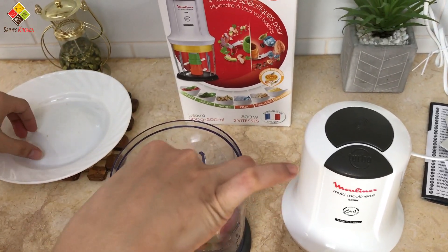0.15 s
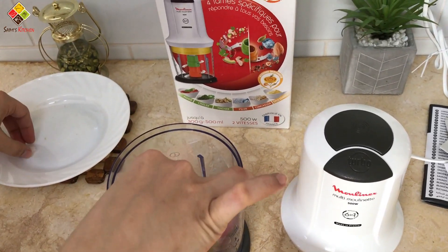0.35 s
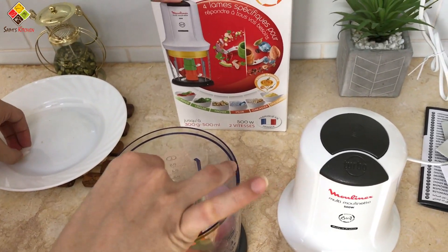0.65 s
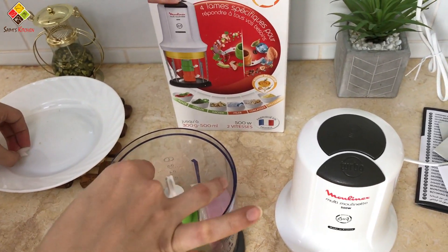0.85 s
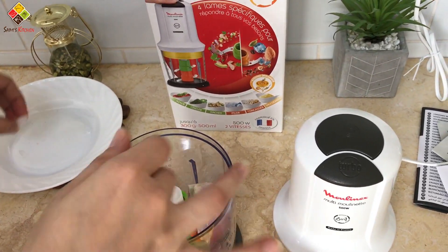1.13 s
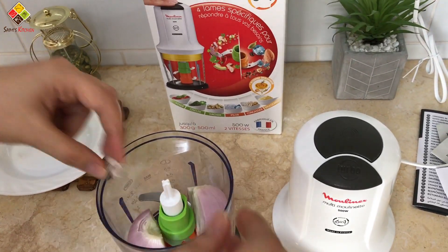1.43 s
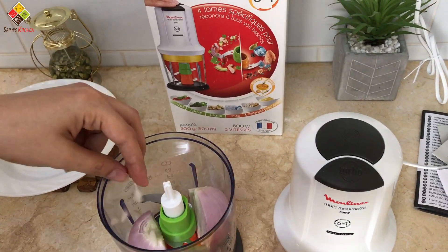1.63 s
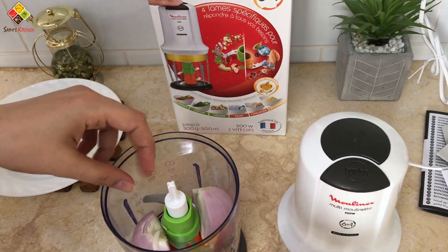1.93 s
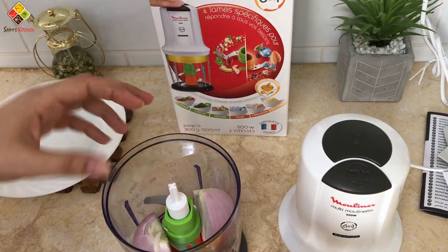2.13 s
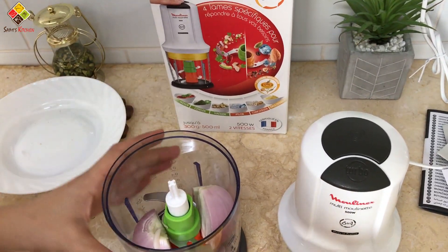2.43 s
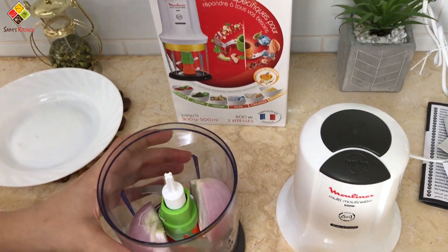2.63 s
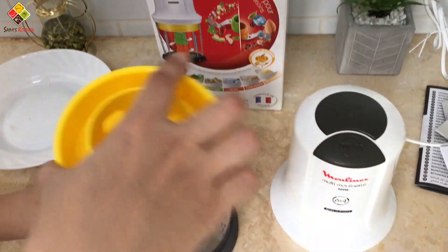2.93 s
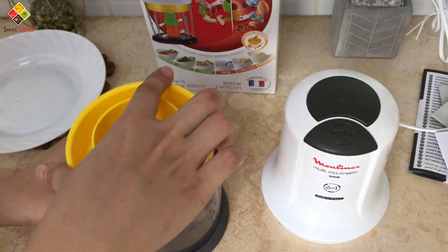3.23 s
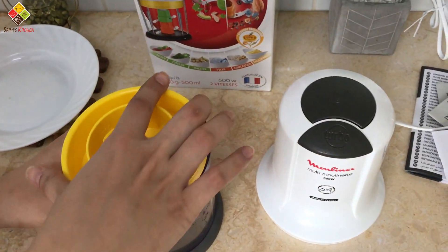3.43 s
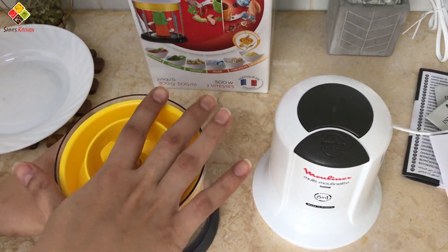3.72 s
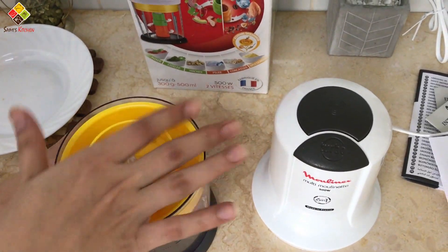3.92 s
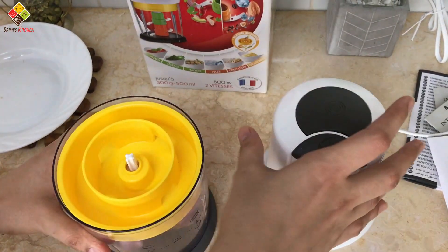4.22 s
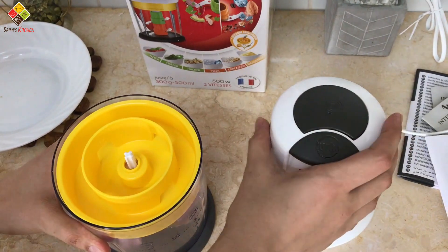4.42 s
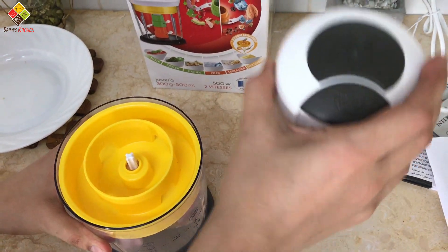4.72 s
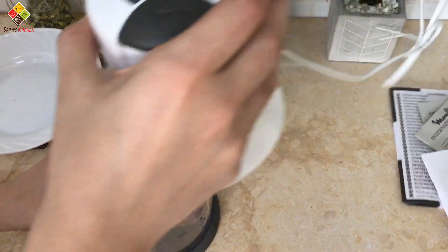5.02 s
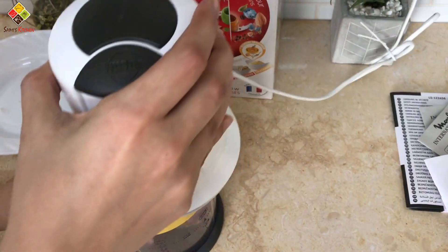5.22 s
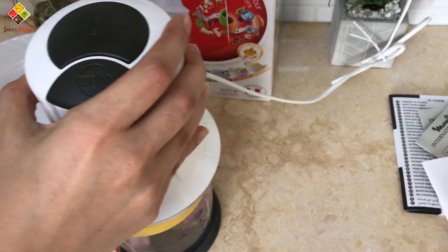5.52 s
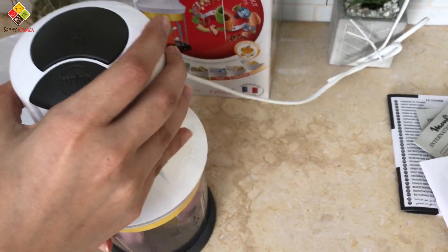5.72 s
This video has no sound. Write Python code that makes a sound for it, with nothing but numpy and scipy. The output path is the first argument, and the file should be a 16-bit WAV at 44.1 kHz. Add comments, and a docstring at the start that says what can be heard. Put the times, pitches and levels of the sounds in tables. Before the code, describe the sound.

A low, throbbing appliance hum runs throughout in a small, slightly echoing kitchen, with soft hiss and a very faint thin whine. At about 0.2 seconds a china plate clinks lightly, and onion drops into a plastic chopper jar, rattling the blade. More dull knocks of onion land around 0.8 seconds, with a softer one at 1.6. A dry click and small rattles come near 2 seconds. At 2.6 the jar is seated with a sharp, bright knock, the loudest sound. From 3.3 to 3.7 the plastic lid is pressed home in a quick run of clacks, with faint rubbing. From about 4 seconds a hand rustles quietly on the motor housing, with a light tap at 4.4 and a brief slide at 5. The housing clunks onto the jar at 5.4, taps a few times and seats with a firm clunk and click near 5.8. Everything is heard close up.

```python
"""In a small tiled kitchen, close to a stone counter, onion is picked off a china plate and dropped
into the plastic jar of a mini chopper, rattling the blade. The jar is knocked into place, the lid is
pressed home and the motor housing is seated on top, switched off. Each impact excites damped normal
modes; hands on plastic make stick-slip noise; the room reverberates. A low appliance hum beats
throughout, with soft air noise and a faint electric whine."""
import sys
import numpy as np
from scipy import signal
from scipy.fft import rfft, irfft
from scipy.io import wavfile
from scipy.ndimage import uniform_filter1d

SR = 44100
rng = np.random.default_rng(int(sys.argv[2]) if len(sys.argv) > 2 else 0)


def wav_record(signal):
    """Record a signal, one row per channel, as 16-bit PCM in the file named by sys.argv[1]."""
    frames = np.transpose(np.atleast_2d(signal))
    bounded = np.clip(frames, -1, 1)
    # unit amplitude maps onto the largest positive 16-bit level
    quanta = np.round(bounded * 32767).astype(np.int16)
    wavfile.write(sys.argv[1], SR, quanta)


N = 258426
TIME_S = np.arange(N) / SR
RING_S = np.arange(SR // 4) / SR  # time since a blow


def undb(db):
    """Decibels to amplitude ratio."""
    return 10 ** (np.asarray(db) / 20)

def unit(x):
    """Normalisation to unit energy."""
    return x / np.sqrt(np.sum(x ** 2))

def level(x, db):
    """Normalisation to an rms level."""
    return unit(x) * np.sqrt(len(x)) * undb(db)

def fade(t, t60_s):
    """Exponential decay, 60 dB down after t60_s."""
    return undb(-60 * t / t60_s)

def add(out, start_s, x):
    """Superposition of x on out from start_s."""
    i = max(int(start_s * SR), 0)
    out[i:i + len(x)] += x[:len(out) - i]

def colour(x, spectrum):
    """Spectral shaping by (frequency_hz, gain_db) points, with a steep roll-off below the lowest."""
    hz, db = np.transpose(spectrum)
    f = np.fft.rfftfreq(len(x), 1 / SR) + 1
    gain = undb(np.interp(np.log(f), np.log(hz), db)) * np.minimum(f / hz[0], 1) ** 2
    return irfft(rfft(x) * gain, len(x))

def noise(spectrum, size):
    """Filtered white noise of unit rms."""
    return level(colour(rng.standard_normal(size), spectrum), 0)

def band(hz, width_hz):
    """Narrow-band noise of unit rms: the wider the Gaussian band, the faster it wavers."""
    f = np.fft.rfftfreq(N, 1 / SR)
    bell = np.exp(-2 * ((f - hz) / width_hz) ** 2)
    return level(irfft(rfft(rng.standard_normal(N)) * bell, N), 0)

def walk(rate_hz, size):
    """Smooth random modulation of unit rms."""
    hold = max(int(SR / rate_hz), 1)
    steps = np.repeat(rng.standard_normal(size // hold + 2), hold)
    return level(uniform_filter1d(steps, hold)[:size], 0)

def ring(modes, detune):
    """Damped normal modes: grip and point of contact set each one's share, pitch and sign."""
    hz, db, t60_s = np.transpose(modes)[:, :, None]
    share_db, shift, side = rng.standard_normal((len(modes), 3)).T[:, :, None]
    sines = np.sin(2 * np.pi * hz * (1 + detune * shift) * RING_S)
    decays = fade(RING_S, t60_s) / np.sqrt(t60_s)  # equal energy for any decay time
    return unit(np.sum(np.sign(side) * undb(db + share_db) * sines * decays, axis=0))

def crack(spectrum, decay_s, db=0):
    """Modal overlap: modes too dense to resolve merge into a brief, pitchless burst."""
    burst = rfft(rng.standard_normal(len(RING_S)) * fade(RING_S, decay_s))
    whitened = irfft(burst / np.abs(burst), len(RING_S))
    return undb(db) * unit(colour(whitened, spectrum) * fade(RING_S, 2 * decay_s))

def struck(blows, body, rise_s):
    """Impact excitation: each blow drives the body afresh; a soft contact low-passes its response."""
    out = np.zeros(N)
    onset = 1 - np.exp(-RING_S / rise_s)
    for start_s, level_db, cutoff_hz in blows:
        contact = signal.butter(2, cutoff_hz, fs=SR, output="sos")
        hit = signal.sosfilt(contact, body() * onset)
        add(out, start_s, hit * undb(level_db) / np.std(hit[:SR // 100]))  # level of the first 10 ms
    return out

def settling(blows, rebound):
    """Rebound: a second, weaker contact follows each blow as the object settles."""
    delay_s, change_db, cutoff_hz = rebound
    return list(blows) + [(s + delay_s, db + change_db, cutoff_hz) for s, db, _ in blows]


# Wavering parts of the hum: pitch_hz, width_hz, level_db
HUM_BANDS = [(43.9, 1.4, -52.5), (57.74, 3.2, -46), (71.4, 2.9, -49), (111.9, 10, -55.5)]
def appliance_hum(pitch_hz=69.7, level_db=-35):
    """Beating: a steady tone throbs against weaker noise bands close to it in frequency."""
    tone = level(np.sin(2 * np.pi * pitch_hz * TIME_S), level_db)
    return tone + sum(undb(db) * band(hz, width_hz) for hz, width_hz, db in HUM_BANDS)

# Spectra of the low air noise and its hiss: frequency_hz, relative_density_db
AIR_SPECTRUM = [(53, -27), (90, -3.5), (94, -14), (168, -10.5), (199, -19), (226, -15.5), (342, -17.5),
                (450, -23), (493, -22), (746, -19.5), (1060, -18), (1210, -21.5), (2000, -31.5),
                (2600, -52), (4400, -120)]
HISS_SPECTRUM = [(2300, 8), (3000, 3.5), (3800, -2.5), (4250, 0), (4900, -11), (5700, -1.5), (6600, -3),
                 (8300, -8.5), (10500, -15.5), (12000, -8.5), (16000, -13.5)]
def air():
    """Stationary broadband noise: soft room air under a faint hiss."""
    return level(noise(AIR_SPECTRUM, N), db=-46) + level(noise(HISS_SPECTRUM, N), db=-62.5)

# Electric tones before modulation: pitch_hz, level_db
WHINE_TONES = [(2417, -82), (2536, -76), (2993, -79), (5593, -82.5), (6245, -79), (6659, -84.5),
               (7779, -85)]
# Their slight drop midway: time_s, gain_db
WHINE_GAIN = [(2.9, 1), (3.5, -1)]
def whine(waver_db=4.0, waver_hz=8.31):
    """Amplitude modulation: faint, thin electric tones waver independently."""
    tones = sum(level(np.sin(2 * np.pi * hz * TIME_S), db) * undb(waver_db * walk(waver_hz, N))
                for hz, db in WHINE_TONES)
    return tones * undb(np.interp(TIME_S, *np.transpose(WHINE_GAIN)))

# Touches on the plate: start_s, level_db, cutoff_hz
PLATE_IMPACTS = [(.186, -47.5, 6000), (.236, -55, 14000)]
# Second contact: delay_s, change_db, cutoff_hz
PLATE_REBOUND = (0.0078, -1, 10000)
# Modes of the china: pitch_hz, energy_db, t60_s
PLATE_MODES = [(4430, 1.5, 0.088), (6305, -8.5, .08), (7446, -3, 0.057), (9000, -3, 0.051),
               (11480, 2.5, 0.06), (14000, -12, 0.026)]
# Dense modes of any thin edge: frequency_hz, relative_density_db
EDGE_SPECTRUM = [(200, -31), (2000, -33), (3400, -4), (4200, -2), (5300, 2.5), (7400, -3), (8500, -1.5),
                 (10500, -9.5), (12000, 0.5), (16000, 0)]
def plate():
    """Free vibration of a stiff plate: china clinks in high modes as onion is picked off it."""
    def body():
        return ring(PLATE_MODES, detune=0.001) + crack(EDGE_SPECTRUM, decay_s=0.033, db=-5)
    return struck(settling(PLATE_IMPACTS, PLATE_REBOUND), body, rise_s=0.00052)

# Snaps of onion skin and plastic catches: start_s, level_db, cutoff_hz
SKIN_AND_CATCH_SNAPS = [(.236, -49.5, 16000), (.674, -58, 14000), (1.107, -55, 9000), (1.1318, -43, 11900),
                        (2.0315, -41, 14000), (2.052, -31, 11200), (2.2222, -47, 6900),
                        (3.486, -51.5, 9000), (3.574, -45.5, 14000), (4.923, -54.5, 3000),
                        (5.7245, -48, 11900), (5.7763, -30.5, 9000)]
def snaps(impacts):
    """Impulse response of a thin edge: a dry, bright click."""
    return struck(impacts, lambda: crack(EDGE_SPECTRUM, decay_s=0.032), rise_s=0.00015)

# Onion landing: start_s, level_db, cutoff_hz
ONION_IMPACTS = [(.2435, -40, 5000), (.747, -38, 1630), (.799, -34.5, 2230), (.836, -42, 1500),
                 (.8485, -26.5, 3020), (1.620, -41.5, 1900), (2.264, -42.5, 1300)]
# Second contact: delay_s, change_db, cutoff_hz
ONION_REBOUND = (.012, -7.5, 1860)
# Modes of the jar under the onion: pitch_hz, energy_db, t60_s
ONION_JAR_MODES = [(616, -4.5, 0.077), (694.5, -2.5, 0.21), (1230, -4, 0.041), (1367, 0.5, 0.044),
                   (1552, 5.5, 0.018), (1854, -3, 0.077), (2250, -2.5, 0.0256), (2780, -11.5, 0.042)]
# Dense modes of any shell: frequency_hz, relative_density_db
SHELL_SPECTRUM = [(100, -10), (500, -7), (1300, 0.5), (2400, -5.5), (3000, -7.5), (4500, -10.5), (6000, -7),
                  (9000, -9), (16000, -7)]
def onion():
    """Soft impact: falling onion loads the jar gradually, giving a dull knock."""
    def body():
        return ring(ONION_JAR_MODES, detune=0.016) + crack(SHELL_SPECTRUM, decay_s=0.015, db=-5.5)
    return struck(settling(ONION_IMPACTS, ONION_REBOUND), body, rise_s=0.00109)

# Rattles of the blade: start_s, level_db, cutoff_hz
BLADE_IMPACTS = [(.244, -36, 6000), (.531, -51, 3000), (.814, -42.5, 3000), (2.019, -40, 2500),
                 (2.051, -45.5, 3000), (2.3095, -50, 4000), (2.576, -31, 3000)]
# Second contact: delay_s, change_db, cutoff_hz
BLADE_REBOUND = (.012, -3, 3700)
# Modes of the blade: pitch_hz, energy_db, t60_s
BLADE_MODES = [(1614.5, -12, 0.0242), (2230, 0.5, 0.029), (2450, -4, 0.014), (2980, -8, 0.011)]
def blade():
    """Repeated contact: the blade rattles in a few heavily damped modes."""
    def body():
        return ring(BLADE_MODES, detune=0.022) + crack(SHELL_SPECTRUM, decay_s=0.044, db=-2)
    return struck(settling(BLADE_IMPACTS, BLADE_REBOUND), body, rise_s=0.00036)

def finger_ticks(count=10, level_db=-65, spread_db=3, cutoff_hz=6000):
    """Random impulses: fingers tick lightly here and there."""
    return snaps([(when * N / SR, level_db + spread_db * (2 * force - 1), cutoff_hz)
                  for when, force in rng.random((count, 2))])

def friction(centre_hz, size, treble_db=-13, grain_db=1.5, grip_db=3):
    """Stick-slip friction: skin catches and slips on plastic in fine grains; unit rms."""
    slips = undb(grain_db * walk(700, size) + grip_db * walk(47.85, size))
    spectrum = [(centre_hz / 5, -16), (centre_hz, 0), (centre_hz * 3, treble_db)]
    return level(noise(spectrum, size) * slips, 0)

# Skin and cord sliding over plastic: start_s, length_s, level_db, centre_hz
STROKES = [(0.447, 0.091, -58, 13000), (.56, 0.043, -58, 12000), (2.33, 0.092, -61, 13000),
           (2.982, 0.14, -63.5, 4360), (3.307, 0.32, -59.5, 6450), (3.766, 0.24, -59.5, 8900),
           (4.972, 0.17, -49, 12900)]
def rubbing(attack_share=0.42, release_share=0.14):
    """Sliding friction: the noise of each stroke swells, holds and fades with the pressure."""
    out = np.zeros(N)
    for start_s, length_s, level_db, centre_hz in STROKES:
        progress = TIME_S[:SR] / length_s
        pressure = np.clip(np.minimum(progress / attack_share, (1 - progress) / release_share), 0, 1)
        add(out, start_s, undb(level_db) * pressure * friction(centre_hz, SR))
    return out

# Knocks seating the jar: start_s, level_db, cutoff_hz
JAR_IMPACTS = [(2.5602, -17, 12600), (2.5822, -29.5, 9000), (2.596, -37, 890)]
# Second contact: delay_s, change_db, cutoff_hz
JAR_REBOUND = (.0043, -8.5, 1210)
# Modes of the jar: pitch_hz, energy_db, t60_s
JAR_MODES = [(180.4, -25, 0.23), (403, -15.5, 0.25), (730, -11.5, 0.15), (1027, -6, 0.17),
             (1180, -9, 0.039), (1466, -7, 0.049), (1630, -9.5, .05), (2263, -14, 0.027), (2645, 7, 0.013),
             (2800, -1, 0.0096), (3090, -6, 0.0074), (3575, 3, 0.023), (5250, -6, 0.02), (6070, -19, 0.033)]
# Its dense modes: frequency_hz, relative_density_db
JAR_SPECTRUM = [(200, -12), (600, -24), (800, -5.5), (1900, -2.5), (2700, 6), (3500, 4.5), (4600, -20),
                (6200, -5), (7500, -14), (16000, -3)]
def jar():
    """Hard impact on a shell: the jar cracks brightly, and its low modes ring longest."""
    def body():
        return ring(JAR_MODES, detune=0.0089) + crack(JAR_SPECTRUM, decay_s=0.014, db=4)
    return struck(settling(JAR_IMPACTS, JAR_REBOUND), body, rise_s=0.00032)

# Knocks pressing the lid home: start_s, level_db, cutoff_hz
LID_IMPACTS = [(3.3529, -41.5, 5030), (3.5121, -32.5, 4030), (3.598, -32, 2550), (3.6093, -19.5, 4840),
               (3.645, -23, 3440)]
# Second contact: delay_s, change_db, cutoff_hz
LID_REBOUND = (.0155, -12, 1600)
# Modes of the lid: pitch_hz, energy_db, t60_s
LID_MODES = [(120, -12, .08), (173, -11, 0.11), (260, -9.5, 0.082), (380, -12.5, 0.037), (526, -5, 0.05),
             (620, -2, 0.023), (980, -13, 0.034), (1140, -2, 0.022), (1370, -1.5, 0.018),
             (1670, -10, 0.0315), (1830, -11, 0.02), (2316, -10.5, 0.092), (2410, -5.5, 0.027),
             (3250, -10, 0.037), (3645, -9.5, 0.039), (4390, -10.5, 0.0185)]
def lid(rim_db=-12, slip_db=-47.5, rim_cutoff_hz=11700):
    """Shell vibration: the lid clacks; its rim ticks too, limited by the force at which it slips."""
    def body():
        return ring(LID_MODES, detune=0.012) + crack(SHELL_SPECTRUM, decay_s=0.023)
    rim = [(s, min(db + rim_db, slip_db), rim_cutoff_hz) for s, db, _ in LID_IMPACTS]
    return struck(settling(LID_IMPACTS, LID_REBOUND), body, rise_s=0.00023) + snaps(rim)

# Rustle of the hand carrying the housing to the jar: time_s, level_db
GRIP_LEVELS = [(4.05, -81), (4.154, -67.5), (4.508, -63.5), (4.638, -58), (4.794, -61), (5.542, -64),
               (5.7, -65.5)]
def grip():
    """Sustained friction: the motor housing rustles in the hand that holds it."""
    level_db = np.interp(TIME_S, *np.transpose(GRIP_LEVELS), left=-np.inf)
    return undb(level_db) * friction(centre_hz=3660, size=N, treble_db=-16.5, grip_db=1.9)

# Knocks on the motor housing: start_s, level_db, cutoff_hz
HOUSING_IMPACTS = [(4.387, -48, 5000), (5.380, -31, 2520), (5.5385, -42, 1500), (5.690, -42, 2000),
                   (5.724, -38, 3500), (5.7617, -20.5, 5600)]
# Second contact: delay_s, change_db, cutoff_hz
HOUSING_REBOUND = (0.00326, -3.3, 1170)
# Modes of the housing: pitch_hz, energy_db, t60_s
HOUSING_MODES = [(116, -12, 0.105), (178, -3.5, 0.06), (292, -5.5, 0.045), (390, -3.5, 0.045),
                 (633, -4, 0.061), (693, -2.5, 0.05), (1066, 1, 0.029), (1240, -1, 0.0168),
                 (1580, -13, 0.0167), (2150, 0, 0.0194), (3200, -9, 0.0068), (5030, -5, 0.013)]
def housing():
    """Damped shell vibration: the motor housing clunks as it is handled and seated."""
    def body():
        return ring(HOUSING_MODES, detune=0.016) + crack(SHELL_SPECTRUM, decay_s=0.041, db=3)
    return struck(settling(HOUSING_IMPACTS, HOUSING_REBOUND), body, rise_s=0.00086)

# The room's tail against the direct sound: frequency_hz, t60_s, energy_db
REVERB_BANDS = [(150, 0.66, -5), (497, 0.59, -6.5), (1300, 0.6, -6.5), (2820, 0.62, -8),
                (6120, 0.36, -10.5), (14000, 0.222, -17)]
def kitchen(direct, early_db=-7, early_t60_s=0.023, rise_s=0.0027):
    """Reverberation: early reflections off counter and tiles, then a tail whose treble dies first."""
    t = TIME_S[:SR * 2 // 3]
    hz, t60_s, db = np.transpose(REVERB_BANDS)
    f = np.fft.rfftfreq(len(t), 1 / SR) + 1
    white = rfft(rng.standard_normal(len(t)))
    onset = 1 - np.exp(-t / rise_s)
    tail = 0
    for k, corner in enumerate(np.eye(len(hz))):
        share = np.interp(np.log(f), np.log(hz), corner)  # crossfade between neighbouring bands
        tail = tail + irfft(white * share, len(t)) * unit(onset * fade(t, t60_s[k])) * undb(db[k])
    echoes = np.zeros(len(t))
    lags = rng.integers(SR // 700, SR // 50, size=40)
    echoes[lags] = rng.standard_normal(len(lags)) * fade(t[lags], early_t60_s)
    return direct + signal.fftconvolve(direct, tail + undb(early_db) * unit(echoes))[:N]

def scene():
    """Superposition: reverberant handling sounds over the steady background, in one channel."""
    knocks = plate() + onion() + jar() + blade() + lid() + housing()
    handling = knocks + snaps(SKIN_AND_CATCH_SNAPS) + finger_ticks() + rubbing() + grip()
    return (kitchen(handling) + appliance_hum() + whine() + air())[None]

def record(dry, cutoff_hz=16000):
    """Band limiting: a steep low-pass filter removes the highest treble."""
    return signal.sosfilt(signal.ellip(10, .2, 80, cutoff_hz, fs=SR, output="sos"), dry)


dry = scene()
out = record(dry)
wav_record(out)
```